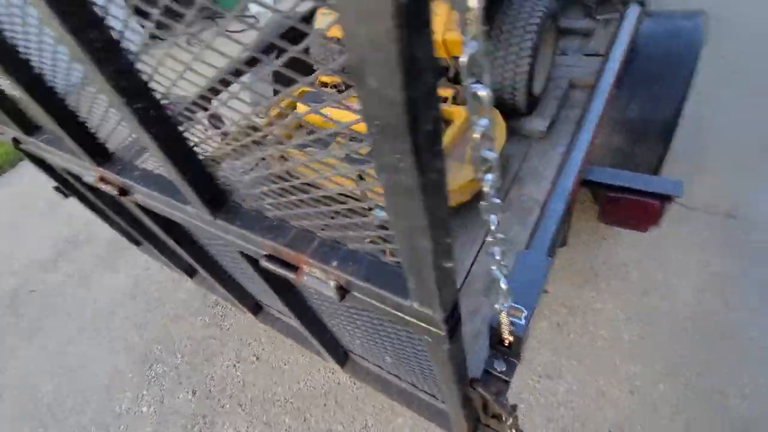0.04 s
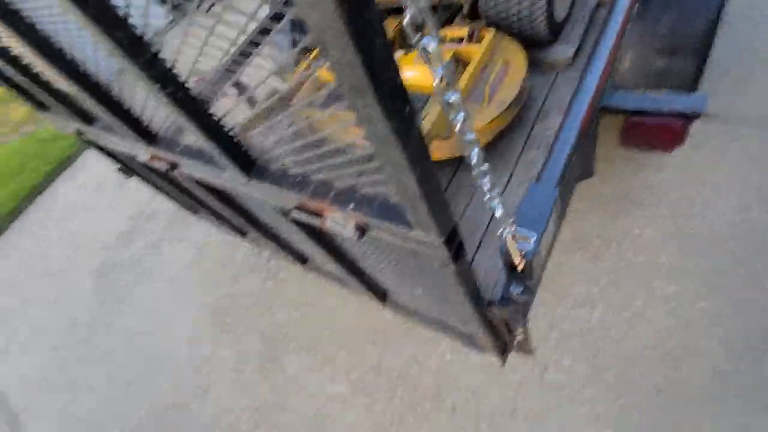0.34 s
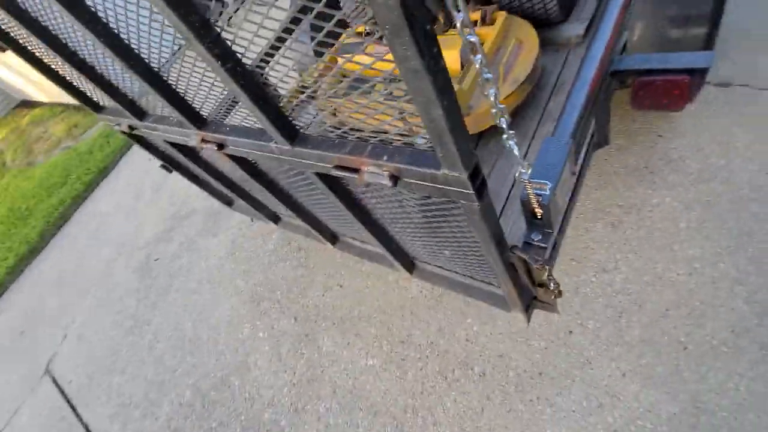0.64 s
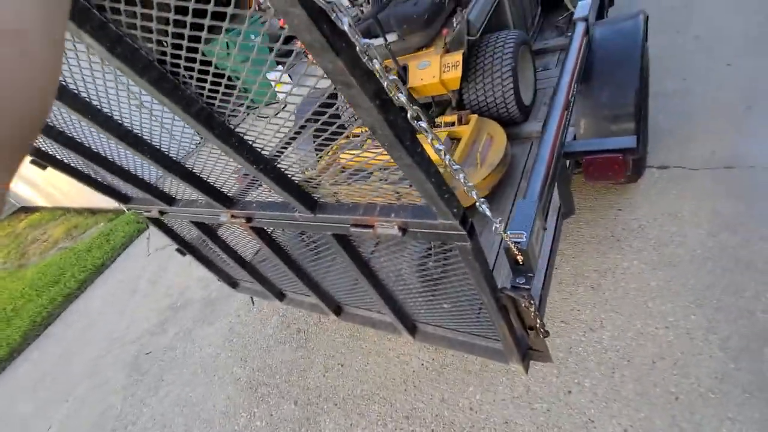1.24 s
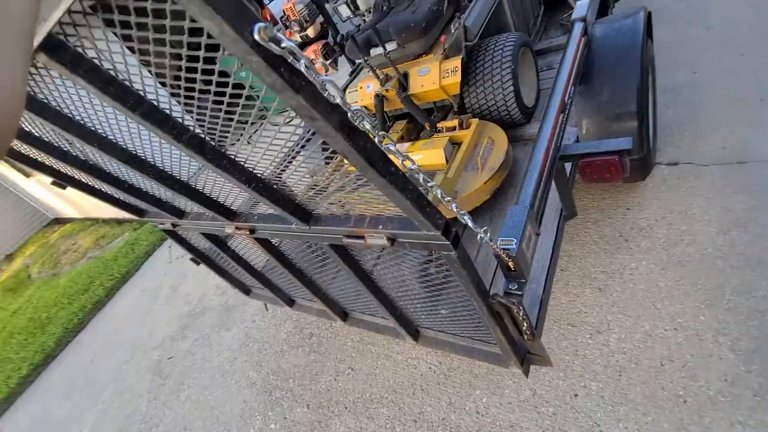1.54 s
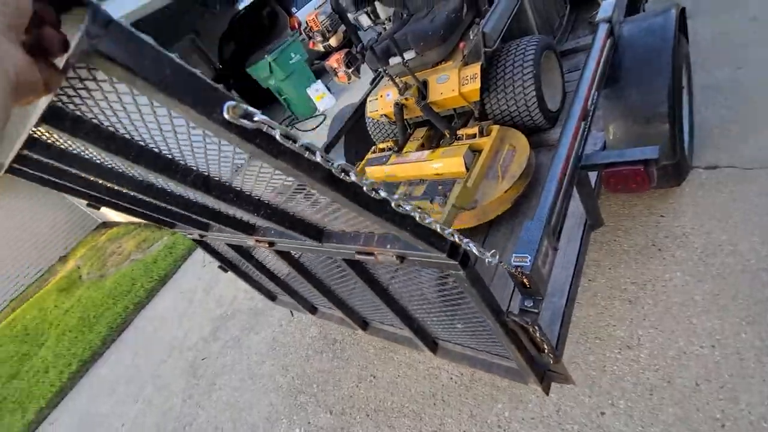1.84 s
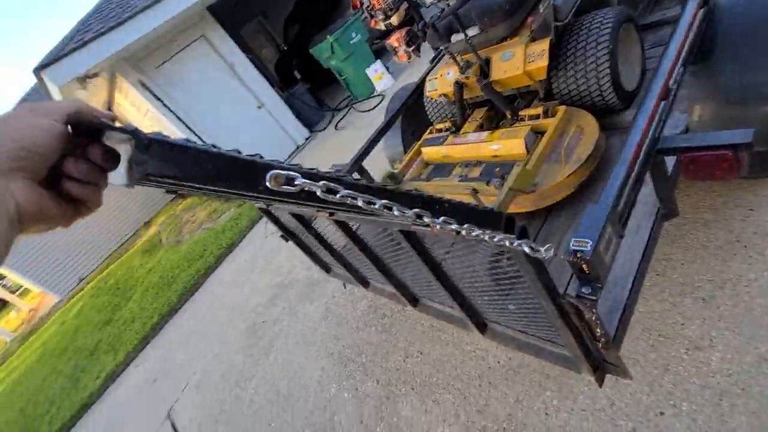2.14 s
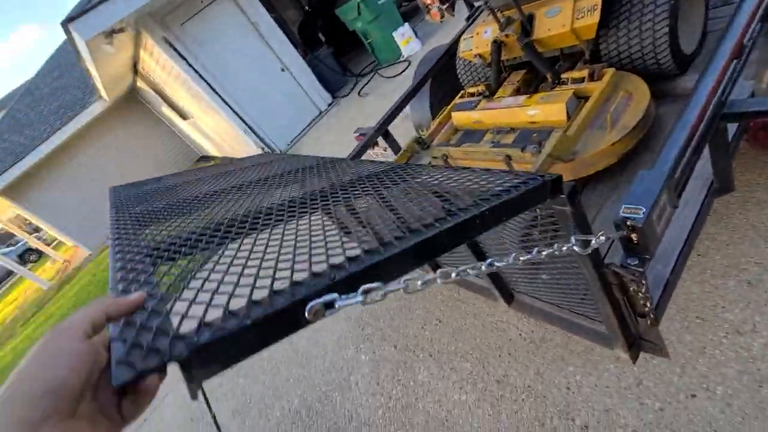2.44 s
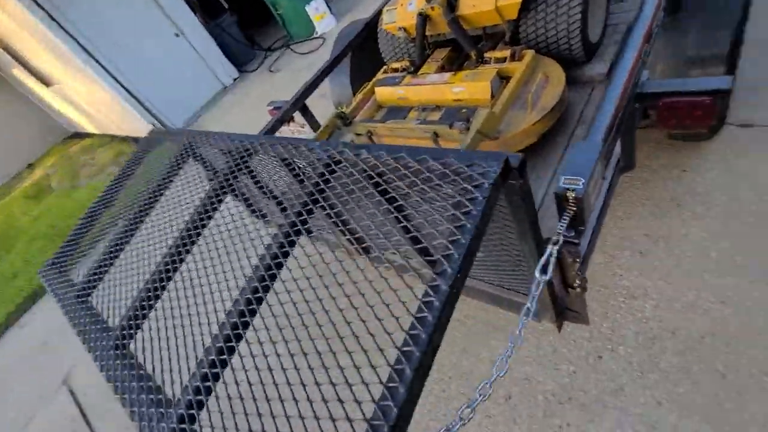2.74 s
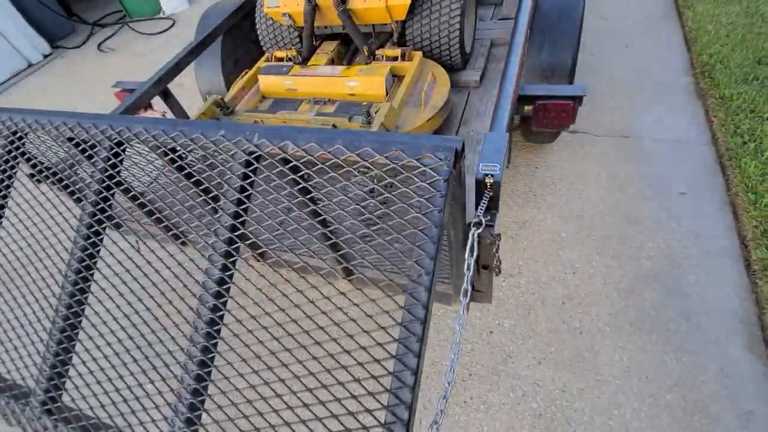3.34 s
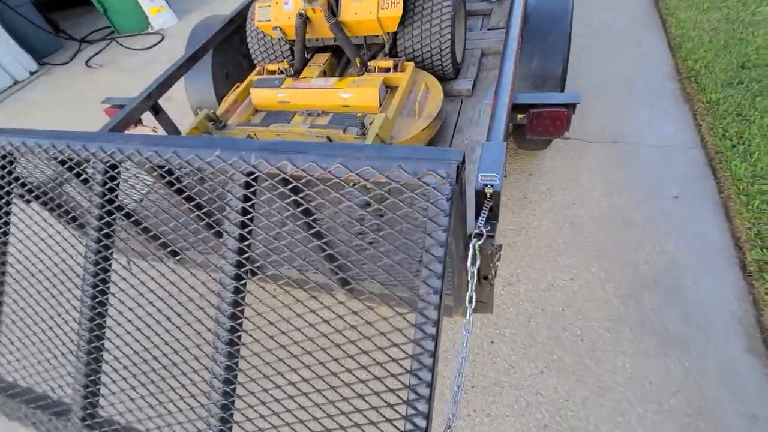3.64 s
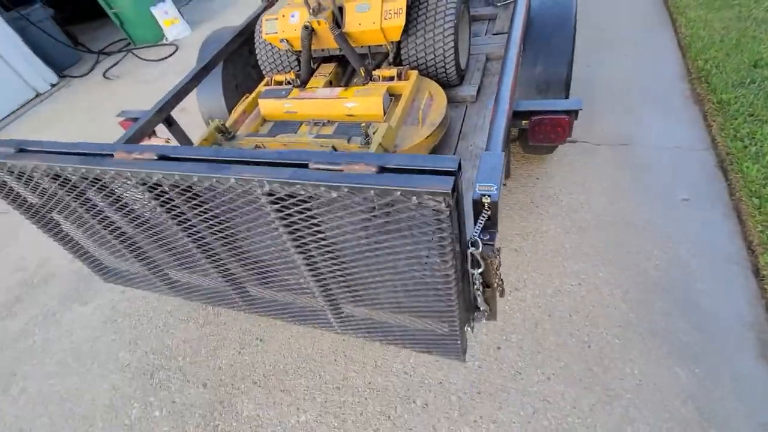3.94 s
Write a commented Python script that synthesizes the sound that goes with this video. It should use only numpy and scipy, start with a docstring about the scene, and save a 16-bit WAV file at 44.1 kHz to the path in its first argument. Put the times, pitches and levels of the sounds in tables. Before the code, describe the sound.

A steel trailer gate squeals on its hinges, scrapes and clanks down outdoors.

```python
"""A driveway, about a metre from a folding steel-mesh trailer gate that is being lowered.
The gate knocks softly as it swings, its dry hinges stick and slip into squeals, and it clanks over.
Rusty steel scrapes, the hinges squeal again and the gate crashes down, frame and mesh ringing.
House fronts return a short echo over a low outdoor rumble."""
import sys
import numpy as np
from scipy import signal
from scipy.fft import rfft, irfft
from scipy.io import wavfile
from scipy.ndimage import uniform_filter1d, minimum_filter1d

SR = 44100
rng = np.random.default_rng(int(sys.argv[2]) if len(sys.argv) > 2 else 0)


def to_wav(sig):
    """Store sig (one row per channel, or 1-D mono) as 16-bit WAV at the path in sys.argv[1].

    Samples outside -1..1 are clipped; the rate is SR.
    """
    pcm = np.clip(np.atleast_2d(sig), -1, 1) * 32767
    pcm = np.round(pcm).astype(np.int16)
    wavfile.write(sys.argv[1], SR, pcm.T)  # frames by channels


N = 176400
T = np.arange(N) / SR
FREQS = np.fft.rfftfreq(N, 1 / SR) + 1e-3
STEEL_T60_S, IMPACT_ECHO_DB = 0.64, -8


def hinges():
    """Dry hinges give two falling creaks and four squeals; the last two overlap and breed extra tones."""
    # glides of the squeals and creaks (time [s], pitch [Hz], level [dB])
    swing_glide = [(2.484, 6040, -25.5), (2.5, 6060, -20.5), (2.512, 6330, -31), (2.55, 6374, -14),
                   (2.582, 6496, -21), (2.61, 6560, -30), (2.66, 6400, -43)]
    thin_glide = [(2.6, 9730, -36), (2.675, 9630, -17.5), (2.712, 9480, -35), (2.74, 9710, -13.5),
                  (2.89, 9506, -37.5), (3.02, 9310, -65)]
    low_glide = [(3.55, 4970, -50), (3.58, 5090, -32.5), (3.594, 6110, -37), (3.622, 6193, -25),
                 (3.68, 6140, -28.5), (3.76, 6156, -28.5), (3.9, 6110, -41.5)]
    high_glide = [(3.665, 6860, -38), (3.7, 6868, -27), (3.755, 6900, -11), (3.81, 6820, -27.5),
                  (3.895, 6790, -35)]
    early_creak = [(.727, 1585, -40.5), (.742, 1190, -44.5)]
    late_creak = [(3.341, 2105, -58), (3.421, 1964, -39.5), (3.48, 1788, -45)]
    # swell of the tone near the sum of the low and high pitches (time [s], level [dB])
    sum_swell = [(3.68, -45), (3.78, -18), (3.825, -10.5), (3.905, -28)]
    sum_hz, sideband_db = 13030, -23
    swing, _ = squeal(swing_glide, jitter=0.0079, octave_db=-4.5, rough=0.012)
    thin, _ = squeal(thin_glide, jitter=0.0041)
    creaks = sum(squeal(glide, jitter=0.045)[0] for glide in (early_creak, late_creak))
    low, low_phase = squeal(low_glide, jitter=0.0095, octave_db=-3.5, rough=0.04)
    high, high_phase = squeal(high_glide, jitter=0.00073, octave_db=6)
    direct = pan(low + high + swing, db=4.5) + pan(thin, db=-1.5) + creaks
    sum_tone = envelope(sum_swell) * np.sin(2 * np.pi * sum_hz * T + 0.5 * wander(96))
    sidebands = np.sin(2 * high_phase - low_phase) + np.sin(3 * high_phase - low_phase)
    extra_tones = sum_tone + amp(sideband_db) * envelope(high_glide) * sidebands
    flutter = amp(3 * wander(40))
    return direct + pan(extra_tones * flutter, db=6.5) + amp(1) * echo(direct)


def squeal(glide, jitter, octave_db=None, rough=0):
    """Stick-slip locks on to a hinge mode; `rough` unsteadies the attack. Returns tone and phase."""
    settle_s, jitter_hz, flutter_db = 0.0386, 223.4, 3
    age = np.maximum(T - glide[0][0], 0)
    waver = jitter + rough * np.exp(-(age / settle_s) ** 2)
    pitch = curve(glide) * (1 + waver * wander(jitter_hz))
    phase = 2 * np.pi * np.cumsum(pitch) / SR
    octave = 0 if octave_db is None else amp(octave_db) * np.sin(2 * phase)
    flutter = amp(flutter_db * (wander(60) + wander(11.4)))
    return (np.sin(phase) + octave) * envelope(glide) * flutter, phase


def clanks():
    """The loose gate rattles against its stops; frame and mesh ring."""
    # bursts of rattle (time [s], rise [s], fall [s], bass [dB], middle [dB], treble [dB])
    hits = [(0.031, 0.014, 0.0027, -33.5, -34.5, -37.5), (0.209, 0.0035, 0.12, -82, -44, -57),
            (0.572, 0.0057, 0.061, -33.5, -37.5, -50), (1.036, 0.0064, 0.074, -39.5, -42.5, -79),
            (1.292, 0.025, 0.012, -45, -50, -52), (2.043, 0.0022, 0.032, -64, -42, -63),
            (2.26, 0.15, 0.28, -41, -52.5, -59.5), (2.59, 0.0056, 0.022, -38.5, -32.5, -34),
            (2.643, 0.023, 0.026, -51, -24, -23), (2.666, 0.019, 0.012, -31, -20, -48.5),
            (2.684, 0.0055, 0.057, -34, -32, -24), (2.845, 0.04, 0.055, -43, -30.5, -41.5),
            (2.981, 0.01, 0.027, -33, -27.5, -37.5), (3.9117, 0.0012, 0.014, -22, -12, -10),
            (3.946, 0.035, 0.092, -27.5, -25.5, -23.5)]
    floor_hz, bass_hz, treble_hz, rolloff_hz = 127, 500, 2490, 7000
    below = lambda hz: 1 / (1 + (FREQS / hz) ** 4)
    bands = [below(bass_hz) * (1 - below(floor_hz)),
             below(treble_hz) * (1 - below(bass_hz)),
             (1 - below(treble_hz)) / np.hypot(1, FREQS / rolloff_hz)]
    band_power = np.zeros((3, N))
    for at, rise, fall, *levels in hits:
        burst = np.exp(-np.where(T < at, ((at - T) / rise) ** 2, (T - at) / fall))
        band_power += np.outer(amp(levels), burst) ** 2
    rattle = contacts(per_s=2500)
    knocks = sum(np.sqrt(power) * unit(shape(rattle, band)) for power, band in zip(band_power, bands))
    direct = knocks + amp(-13) * frame(knocks) + amp(-15) * mesh(knocks, count=140)
    return direct + amp(IMPACT_ECHO_DB) * echo(direct)


def thuds():
    """The weight of the gate lands on a stop and a long bar of the frame rings low."""
    # low bar notes (time [s], level [dB], pitch [Hz], decay [s])
    notes = [(.587, -32, 275, .015), (1.057, -28, 417.3, 0.047), (2.661, -15.5, 240, 0.0074),
             (2.669, -21.5, 513.5, 0.019), (2.866, -25, 258.5, .018)]
    direct = sum(amp(db) * decay(at, fall) * np.sin(2 * np.pi * hz * (T - at))
                 for at, db, hz, fall in notes)
    return direct + amp(IMPACT_ECHO_DB) * echo(direct)


def clinks():
    """Small steel parts tick and the hinge pin rings very high, each a tight cluster of modes."""
    # ticks of chain, latch and frame (time [s], level [dB], pitch [Hz], decay [s])
    taps = [(0.035, -10.5, 1285, 0.00084), (.122, -32.5, 2950, 0.00036), (0.1788, -26, 3000, 0.00031),
            (0.571, -33, 1820, 0.035), (0.983, -41, 1230, 0.032), (1.277, -39.5, 1930, 0.011),
            (1.296, -33.5, 3170, 0.0068), (2.041, -35.5, 1840, 0.035), (2.624, -22, 3120, 0.083),
            (3.0866, -16, 3150, 0.0024), (3.1, -29.5, 3150, 0.024), (3.15, -34.5, 3140, .012)]
    # hard steel-on-steel strikes on the pin (time [s], level [dB], decay [s])
    strikes = [(2.672, -8, .012), (3.912, -13, 0.092)]
    pin_hz, pin_width_hz = 15100, 200
    noise = stereo_noise()
    cluster = lambda hz, width: unit(shape(noise, 1 / (1 + ((FREQS - hz) / width) ** 2)))
    ticks = sum(amp(db) * decay(at, fall) * cluster(hz, width=0.15 * hz) for at, db, hz, fall in taps)
    pin = cluster(pin_hz, pin_width_hz) * sum(amp(db) * decay(at, fall) for at, db, fall in strikes)
    direct = ticks + pin
    return direct + amp(-19) * echo(direct)


def scrape():
    """Rusty steel grinds under a fine hiss; the harder it rubs, the more the frame rings."""
    # rubbing of the hinges (time [s], grind level [dB], hiss level [dB])
    rub = [(.5, -59.5, -75), (.72, -45.5, -59.5), (1.2, -60, -76), (1.52, -51, -63.5), (1.9, -60, -85),
           (2.58, -45, -64), (2.72, -35, -59), (3.075, -44, -61), (3.1, -36.5, -39), (3.24, -38, -43.5),
           (3.33, -34.5, -34.5), (3.45, -41.5, -44), (3.8, -49, -71)]
    # tone colours of grind and hiss (frequency [Hz], level [dB])
    grind_colour = [(300, -7), (800, -19), (1300, 0.5), (3400, -2), (4500, -10.5), (16000, -48)]
    hiss_colour = [(1500, -27), (3500, -13), (8800, -10), (16000, -14)]
    effort_db = curve(rub)
    ringing = amp(np.minimum(0.5 * (effort_db + 44), 6))
    grit = coloured(contacts(per_s=900), grind_colour)
    grind = (grit + ringing * frame(grit)) / np.hypot(1, ringing)  # equal-power blend
    fine_grit = contacts(per_s=4000, spread_db=5)
    hiss = coloured(fine_grit + mesh(fine_grit, count=220), hiss_colour)
    return grind * amp(effort_db + 2.96 * wander(14)) + hiss * amp(curve(rub, column=2))


def contacts(per_s, spread_db=0):
    """Dense tiny impacts, each a puff of stereo noise; `spread_db` makes their sizes uneven."""
    smear_s = 0.00078
    impacts = rng.random(N) < per_s / SR
    sizes = impacts * amp(spread_db * np.minimum(rng.exponential(size=N), 4))
    power = signal.lfilter([1], [1, -np.exp(-1 / (smear_s * SR))], sizes ** 2)
    return unit(pair(rng.standard_normal((2, N)) * np.sqrt(power)))


def frame(drive):
    """The steel frame rings in close clusters, as like bars have slightly different pitches."""
    # frame modes (frequency [Hz], level [dB])
    modes = [(250, 3.5), (385, -0.5), (490, 1.5), (1141, -6), (1272, 3.5), (1421, -1.5), (1770, 2.5),
             (1870, 1), (2300, -3), (2560, -3), (3865, 5)]
    t = T[T < STEEL_T60_S]
    bars = np.zeros(len(t))
    for hz, db in modes:
        pitches = hz * (1 + 0.00498 * rng.standard_normal(3))
        bars += amp(db) * np.sin(2 * np.pi * np.outer(pitches, t)).sum(axis=0)
    return unit(convolve(drive, bars * amp(-60 * t / STEEL_T60_S))) * drive.std()


def mesh(drive, count):
    """The many strands of the mesh ring at scattered pitches, all about as strongly."""
    pitches = np.geomspace(1000, 15000, count) * (1 + 0.025 * rng.standard_normal(count))
    t = T[T < STEEL_T60_S]
    polarity = np.sign(rng.standard_normal((2, count)))
    strands = polarity @ np.sin(2 * np.pi * np.outer(pitches, t))
    return unit(convolve(drive, strands * amp(-60 * t / STEEL_T60_S))) * drive.std()


def echo(x):
    """Scattered reflections from trailer, concrete and house fronts."""
    t60_s, predelay_s = 0.44, 0.00542
    tail = stereo_noise() * amp(-60 * T / t60_s) * (T > predelay_s)
    return convolve(x, unit(tail) / np.sqrt(N))


def outdoors():
    """A bed of low neighbourhood rumble, with a wavering hum that swells and eases."""
    # tone colour of the rumble (frequency [Hz], level [dB])
    rumble_colour = [(20, -14.5), (45, -3), (90, 1), (200, -13), (380, -11), (600, -22), (1500, -26.5),
                     (8000, -49), (16000, -52)]
    # swells of rumble and hum (time [s], level [dB])
    rumble_swell = [(0, -42.5), (1, -38.5)]
    hum_swell = [(1.0, -44.5), (1.9, -36.5), (2.2, -40), (2.7, -43)]
    rumble = coloured(stereo_noise(), rumble_colour)
    hum_hz = 142.5 * (1 + 0.0292 * wander(16.8))
    hum = np.sin(2 * np.pi * np.cumsum(hum_hz) / SR)
    return rumble * amp(curve(rumble_swell)) + hum * amp(curve(hum_swell) + 0.24 * wander(5.4))


def amp(db):
    """Decibels to gain."""
    return 10 ** (np.asarray(db) / 20)


def unit(x):
    """Scale to rms 1."""
    return x / np.sqrt(np.mean(x ** 2))


def curve(rows, column=1):
    """One column of a table, joined by straight lines in time."""
    rows = np.array(rows)
    return np.interp(T, rows[:, 0], rows[:, column])


def envelope(rows, release_s=0.0047):
    """Gain from a table's last column, dying quickly outside its time span."""
    outside = np.maximum(np.maximum(rows[0][0] - T, T - rows[-1][0]), 0)
    return amp(curve(rows, column=-1)) * np.exp(-outside / release_s)


def decay(at, fall):
    """Sudden start and exponential decay."""
    return (T >= at) * np.exp(-np.abs(T - at) / fall)


def wander(rate_hz):
    """Smooth random drift with rms 1."""
    return unit(shape(rng.standard_normal(N), np.exp(-(FREQS / rate_hz) ** 2)))


def by_pitch(points):
    """Points joined on a log-frequency axis."""
    hz, value = np.array(points).T
    return np.interp(np.log(FREQS), np.log(hz), value)


def shape(x, gain):
    """Filter with a gain for each frequency."""
    return irfft(rfft(x) * gain, N)


def coloured(x, colour):
    """Equalise to a tone colour, at rms 1."""
    return unit(shape(x, amp(by_pitch(colour))))


def convolve(x, response):
    """Pass a sound through an impulse response."""
    return signal.fftconvolve(np.atleast_2d(x), np.atleast_2d(response), axes=1)[:, :N]


def pair(x):
    """Make two unrelated signals alike in the bass, as close microphones hear them."""
    # likeness of left and right (frequency [Hz], correlation [0-1])
    likeness = [(300, 1), (650, 0.4), (1400, 0.0546)]
    alike = np.clip(by_pitch(likeness), 0, 1)
    mid = shape(x[0], np.sqrt((1 + alike) / 2))
    side = shape(x[1], np.sqrt((1 - alike) / 2))
    return np.array([mid + side, mid - side])


def stereo_noise():
    """White noise, narrow in the bass and wide in the treble."""
    return pair(rng.standard_normal((2, N)))


def pan(x, db):
    """Place a sound by left minus right level."""
    return x * amp(np.array([[db], [-db]]) / 2)


def off_centre(x, lag_s=0.000226):
    """Sound from one side reaches the left microphone later."""
    late = np.concatenate([np.zeros(int(lag_s * SR)), x[0]])
    return np.array([late[:N], x[1]])


def scene():
    """The hinges ahead; gate and surroundings off to one side."""
    return hinges() + off_centre(clanks() + thuds() + clinks() + scrape() + outdoors())


def record(dry):
    """The two microphones differ in colour; a limiter holds the peaks; the top is cut."""
    # stereo balance (frequency [Hz], left minus right [dB])
    balance = [(450, 0.5), (1700, -5.5), (5800, 3)]
    ceiling, limiter_s, fade_in_s, top_hz = 0.9, 0.004, 0.005, 15900
    tilt_db = by_pitch(balance) / 2
    x = shape(dry, amp([tilt_db, -tilt_db])) * np.minimum(T / fade_in_s, 1)
    span = int(limiter_s * SR)
    safe_gain = ceiling / np.maximum(np.abs(x).max(axis=0), ceiling)
    gain = uniform_filter1d(minimum_filter1d(safe_gain, 2 * span), span)
    top_cut = signal.ellip(12, 0.2, 80, top_hz, fs=SR, output="sos")
    return signal.sosfilt(top_cut, x * gain)


dry = scene()
out = record(dry)
to_wav(out)
```